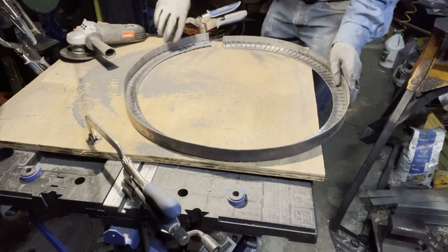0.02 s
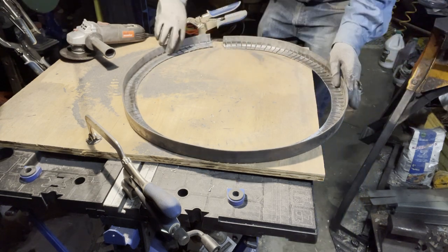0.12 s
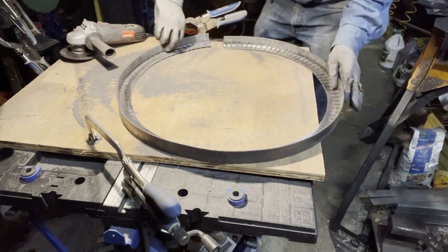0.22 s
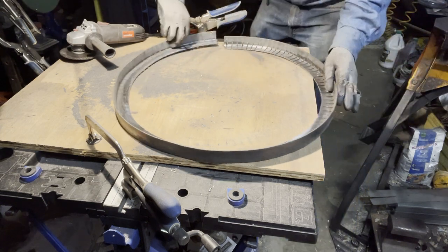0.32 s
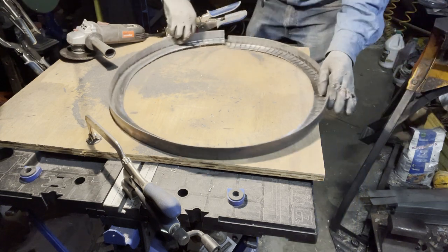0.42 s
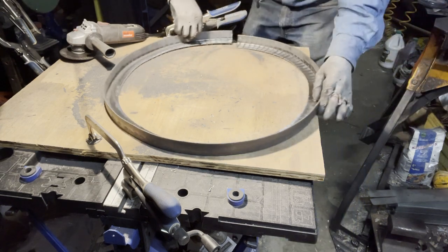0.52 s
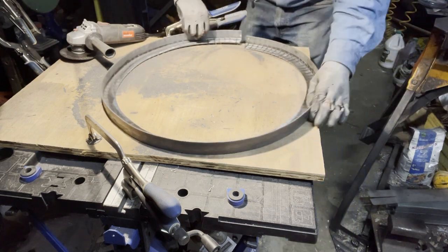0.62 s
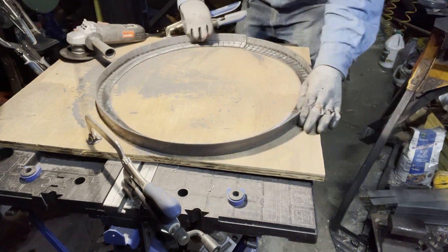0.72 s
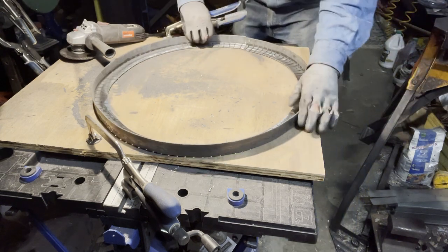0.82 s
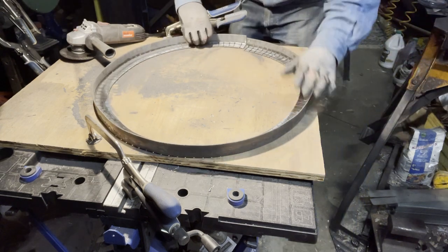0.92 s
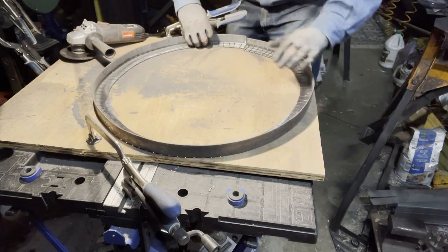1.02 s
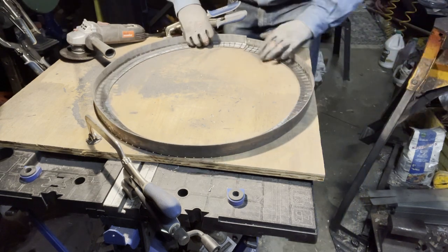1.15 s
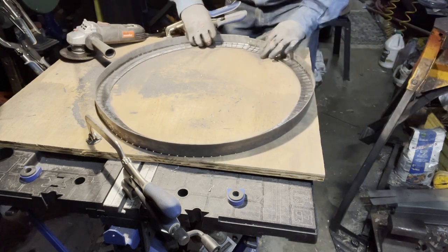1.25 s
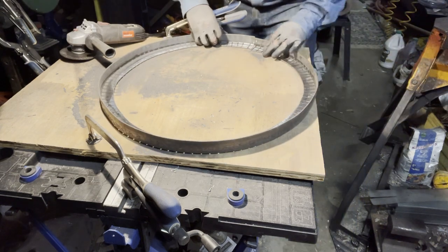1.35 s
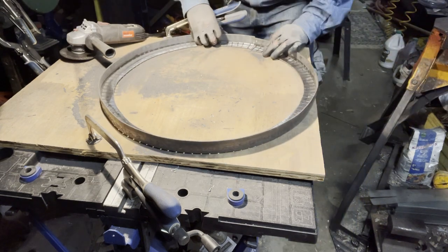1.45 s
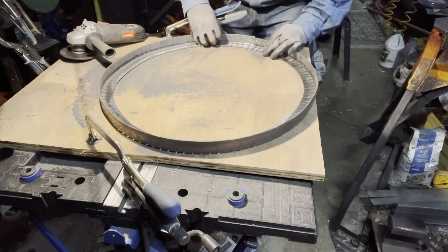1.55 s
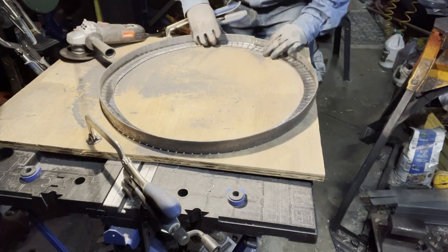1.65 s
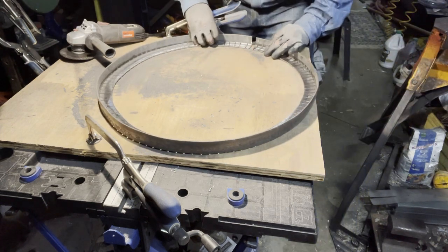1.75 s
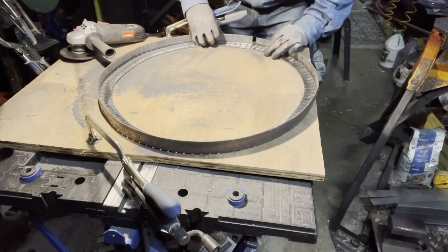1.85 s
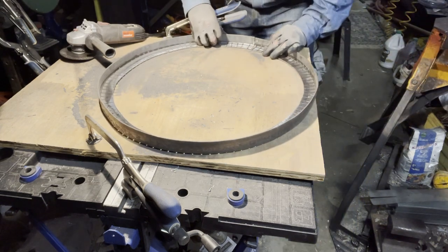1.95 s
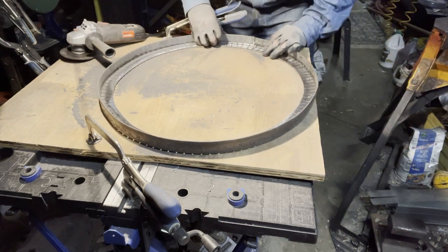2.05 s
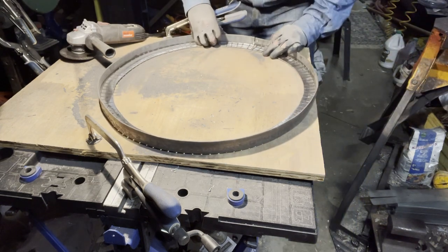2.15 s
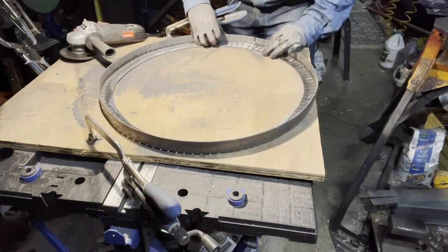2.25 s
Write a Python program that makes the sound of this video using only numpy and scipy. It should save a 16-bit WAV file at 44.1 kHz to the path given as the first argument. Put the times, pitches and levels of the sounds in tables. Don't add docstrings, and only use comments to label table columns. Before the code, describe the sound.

Bent steel band scrapes across a plywood bench top, one long drag then short nudges

```python
import sys
import numpy as np
from scipy import signal
from scipy.fft import rfft, irfft
from scipy.io import wavfile
from scipy.ndimage import uniform_filter1d

SR = 44100
rng = np.random.default_rng(int(sys.argv[2]) if len(sys.argv) > 2 else 0)


def bounce(signal):
    frames = np.transpose(np.atleast_2d(signal))
    limited = np.clip(frames, -1, 1)
    pcm = np.round(limited * 32767).astype(np.int16)
    wavfile.write(sys.argv[1], SR, pcm)


def to_linear_factor(level_db):
    exponent = np.asarray(level_db, float) / 20
    return 10 ** exponent


N = 101430

# (time [s], peak [dB], band ring re peak [dB], fade t60 [s])
SLIPS = [(0.841, -15.5, -26, 0.12), (0.9139, -24.5, -23, 0.17), (0.9743, -39, -9, 0.17),
         (1.0625, -40, -29, 0.17), (1.0949, -40.5, -19, 0.074), (1.141, -39.5, -15, 0.07),
         (1.1668, -48, -3, 0.11), (1.2064, -33.5, 3, 0.17), (1.5757, -51.5, -3, 0.095),
         (1.6192, -51.5, 14.5, 0.079), (1.7348, -30.5, -4, 0.21), (1.919, -45.5, 15, 0.1),
         (2.228, -51, 7, 0.25)]
# (time [s], peak [dB], band ring re peak [dB])
KNOCKS = [
    (0.54, -14, -3),
    (0.693, -21, -6),
    (0.833, -31, -1),
    (0.931, -28.5, 5.5),
    (1.125, -53, -5),
    (1.622, -35, -10),
    (1.758, -36, -21),
    (1.991, -9, -11.5),
]


def level(x, rms_db):
    return x * to_linear_factor(rms_db) / np.sqrt(np.mean(x ** 2))


def on_log(table, hz):
    table = np.array(table, float)
    return np.interp(np.log(hz + 1), np.log(table[:, 0] + 1), table[:, 1])


def colour(x, table):
    return irfft(rfft(x) * to_linear_factor(on_log(table, np.fft.rfftfreq(N, 1 / SR))), N)


def walk(rate_hz):
    hold = int(SR / rate_hz)
    steps = np.repeat(rng.standard_normal(N // hold + 1), hold)
    return 1.57 * uniform_filter1d(steps, hold)[:N]


def clicks(rate_per_s, spread_db, patchy_db):
    when, size, sign = rng.random((3, N))
    height = to_linear_factor(-spread_db * np.log(size + 1e-9))
    x = (when < rate_per_s / SR) * height * np.sign(sign - 0.5)
    return level(x * to_linear_factor(patchy_db * walk(45.24)), 0)


def ring(x, modes, wander_db):
    out = 0
    for k, (hz, db, t60_s) in enumerate(modes):
        pole = np.exp(2j * np.pi * hz / SR - np.log(1000) / (t60_s * SR))
        drive = x * to_linear_factor(wander_db * walk(18))
        gain = (-1) ** k * to_linear_factor(db) / np.sqrt(t60_s)
        out = out + gain * signal.lfilter([1], [1, -pole], drive).imag
    power = sum(to_linear_factor(2 * db) for _, db, _ in modes)
    return out / np.sqrt(SR / np.log(1000) / 4 * power)


def fade(at_s, t60_s):
    t = np.arange(N) / SR - at_s
    return (t >= 0) * to_linear_factor(-60 * np.maximum(t, 0) / t60_s)


def strokes():
    # (time [s], board pressure [dB], sliding speed re pressure [dB], grit re pressure [dB])
    drag = [
        [(0.05, -81, -15, -1), (0.08, -60, 5.5, -6), (0.12, -54.5, 6.5, -11.5), (0.2, -39.5, -5.5, -16.5),
         (0.266, -32.5, -5, -15.5), (0.356, -31.5, -9.5, -20), (0.372, -37.5, 1.5, -11.5),
         (0.484, -26.5, -1.5, -14.5), (0.552, -21, -18.5, -14), (0.6, -32.5, -0.5, -6.5)],
        [(0.6, -23, -10, -18), (0.692, -23.5, -5.5, -17.5), (0.75, -34, 1.5, -14.5),
         (0.814, -32.5, -2.5, -11.5), (0.834, -23, -15, -23.5), (0.848, -32.5, -5, -10.5),
         (1.02, -51, 0.5, -13.5), (1.1, -79, 21.5, 11)],
    ]
    nudges = [
        [(1.1, -80, 25, 15), (1.128, -47.5, -6, -18.5), (1.182, -62, -6, 4.5), (1.214, -41, -25, -26.5),
         (1.26, -49, -15, -9.5), (1.3, -38.5, -10, -17.5)],
        [(1.3, -45, -7, -17), (1.32, -28.5, -4.5, -17.5), (1.338, -25, -15.5, -17.5), (1.36, -20.5, -7.5, -21),
         (1.43, -24.5, -6, -17.5), (1.56, -105.5, 27, 9)],
        [(1.56, -67, -15.5, -5), (1.592, -63.5, -10, -3), (1.63, -39, -6, -30), (1.656, -54, -2, -20),
         (1.708, -68, -2, -9), (1.72, -53, -11, -16)],
        [(1.72, -49.5, -2, -33), (1.736, -37, -6.5, -39), (1.752, -36.5, 1.5, -19.5),
         (1.838, -30.5, -10, -17.5), (1.896, -51.5, 2.5, -11.5), (1.9, -59, -7, -22)],
        [(1.9, -59, 3, -9), (1.93, -37, 0, -12.5), (1.985, -27, -5, -19.5), (2.005, -26.5, -2, -30),
         (2.035, -41, -1, -32), (2.09, -74.5, 19, -39), (2.13, -76, 0.5, -15), (2.21, -79, -3.5, -13),
         (2.235, -52, -4.5, -16), (2.3, -56.5, -2, -19)],
    ]
    time_s, press, slide, grit = np.vstack(drag + nudges).T
    t = np.arange(N) / SR
    return [np.interp(t, time_s, db) for db in (press, press + slide, press + grit)]


def board(press_db, noise):
    # (frequency [Hz], level [dB], t60 [s])
    board_modes = [(96.1, -5.5, 0.23), (118.6, -5, .12), (146, -3.5, 0.14), (175.6, -2, 0.078),
                   (230.7, -5.5, 0.12), (265.4, -3.5, 0.064), (343.2, -1.5, 0.098), (409.8, -5, 0.096),
                   (491, -7.5, 0.093), (586, -8.5, 0.043), (766.7, -4, 0.061), (816, -2.5, 0.051),
                   (858, -3.5, 0.024), (1023, -6.5, 0.011)]
    jolts = to_linear_factor(press_db - 0.5) * clicks(350, 0.97, 0.56)
    knock_noise = level(signal.lfilter([1, -1], [1, -0.86], noise), 0)
    thud = sum(to_linear_factor(db - 6) * fade(s, 0.03) for s, db, _ in KNOCKS) * knock_noise
    low_cut = signal.butter(3, 75, "high", fs=SR, output="sos")
    return signal.sosfilt(low_cut, ring(jolts, board_modes, 1.2) + ring(thud, board_modes, 0))


def band(slide_db, noise):
    # (frequency [Hz], level [dB], t60 [s])
    band_modes = [(1203, -6, 0.036), (1312, -5, 0.046), (1534, -5, 0.025), (1656, -1.5, 0.041),
                  (1923, -8.5, 0.11), (2043, -2, 0.02), (2145, 0, 0.039), (2218, -1, 0.053),
                  (2447, -8, 0.036), (2549, -4, 0.054), (2790, -13, 0.06), (3014, -18, 0.037),
                  (3122, -12.5, 0.056), (3710, -12.5, 0.036)]
    # (frequency [Hz], level [dB], t60 [s])
    after_modes = [(1163, -7, .2), (1351, 0, .24), (2175, -5, .25), (2900, -9, .3), (2805, -8, .3),
                   (3760, -19, .3), (4120, -14, .25)]
    # (frequency [Hz], density [dB per Hz])
    rasp_spectrum = [(500, -12.5), (950, 2.5), (1500, -8), (2200, 3), (3200, -13.5), (3600, -10.5),
                     (6000, -24)]
    hits = sum(to_linear_factor(db + rel - 1.5) * fade(s, 0.024) for s, db, rel in KNOCKS)
    hits = hits + sum(to_linear_factor(db + rel - 3) * fade(s, 0.032) for s, db, rel, _ in SLIPS)
    drive = to_linear_factor(slide_db) * clicks(1300, 1.58, 0.98) + hits * noise
    rasp = colour(drive, rasp_spectrum) * to_linear_factor(2.5)
    steel = ring(drive, band_modes, 2) + to_linear_factor(-11) * ring(drive, after_modes, 1)
    return rasp + to_linear_factor(-3.5) * steel


def grit_and_spit(grit_db, noise):
    # (frequency [Hz], width [Hz], level [dB])
    sheen_modes = [(4450, 170, 7.5), (4574, 26, 14), (5140, 35, 11), (5760, 61, -12), (6084, 65, 8),
                   (6540, 35, -5), (6900, 54, 11.5), (7280, 28, 3), (7100, 20, -19), (7980, 33, 2.5),
                   (8850, 33, 13), (8430, 81, -14), (10200, 21, -18), (9950, 83, 8)]
    # (frequency [Hz], density [dB per Hz])
    grit_spectrum = [(500, -9), (1000, -2.5), (3000, 0), (6000, -7), (10500, -12), (13000, -11),
                     (15600, -15), (16200, -62)]
    hiss = to_linear_factor(grit_db + 1.16 * walk(60.4))
    spit = sum(to_linear_factor(db - 15) * (fade(s, t60_s) + 0.46 * fade(s, 0.0087)) for s, db, _, t60_s in SLIPS)
    grains = clicks(7000, 1.3, 0.6)
    modes = [(hz, db, 2.2 / width_hz) for hz, width_hz, db in sheen_modes]
    sheen = ring((hiss + spit) * grains, modes, 4)
    hiss_noise = level(colour(grains, grit_spectrum), 5.8)
    spit_noise = level(signal.lfilter([1, -1], [1, -0.6], colour(noise, grit_spectrum)), 4.8)
    return to_linear_factor(-10) * sheen + hiss * hiss_noise + spit * spit_noise


def scrape():
    press_db, slide_db, grit_db = strokes()
    noise = rng.standard_normal(N)
    return board(press_db, noise) + band(slide_db, noise) + grit_and_spit(grit_db, noise)


def catches():
    # (time [s], peak [dB], pitch [Hz])
    catch_events = [(.268, -27, 365), (0.287, -27, 124), (0.404, -31, 2100), (0.541, -19, 298),
                    (.550, -21.5, 910), (0.557, -26, 217), (0.579, -33, 246), (.612, -20, 790),
                    (0.626, -23, 420), (.634, -21.5, 400), (.635, -17, 900), (.693, -17.5, 231),
                    (.704, -21.5, 292), (.835, -21, 340), (1.2077, -30, 2320), (1.2085, -34.5, 775),
                    (1.213, -34.5, 935), (1.331, -30, 766), (1.36, -19.5, 2280), (1.385, -20, 193),
                    (1.398, -19.5, 310), (1.411, -19.5, 306), (1.427, -19.5, 187), (1.446, -27, 228),
                    (1.809, -25.5, 298), (1.991, -18.5, 1640), (1.9936, -23, 349), (1.9975, -16, 790),
                    (1.9996, -21, 402), (2.004, -22.5, 2100)]
    swell_cycles = 0.82
    out = np.zeros(N)
    for s, db, hz in catch_events:
        cycles = np.maximum(np.arange(N) / SR - s, 0) * hz
        swell = np.e * cycles / swell_cycles * np.exp(-cycles / swell_cycles)
        out += to_linear_factor(db) * swell * np.sin(2 * np.pi * cycles)
    return out


def sings():
    # (time [s], pitch [Hz], level [dB], length [s])
    sung_modes = [(.656, 800, -19.5, .018), (.52, 3150, -36, .025), (.582, 3200, -35, .045),
                  (.875, 5085, -45, .05), (.442, 1035, -32, .03), (.605, 800, -27, .035),
                  (.697, 790, -27, .03), (.235, 850, -39, .04), (2.023, 2170, -34, .025),
                  (.634, 2250, -33, .015), (.775, 800, -33, .045), (.726, 2150, -31, .012),
                  (1.345, 810, -28, .035), (1.39, 800, -28, .03), (.485, 1030, -33, .02)]
    t = np.arange(N) / SR
    out = np.zeros(N)
    for s, hz, db, length_s in sung_modes:
        swell = np.exp(-((t - s) / length_s * 2) ** 2)
        out += to_linear_factor(db + walk(90)) * swell * np.sin(2 * np.pi * hz * t)
    return out


def hum():
    t = np.arange(N) / SR
    return np.sqrt(2) * to_linear_factor(-54 + 2 * walk(20.75)) * np.sin(2 * np.pi * 119.9 * t)


def shop():
    # (frequency [Hz], density [dB per Hz])
    rumble_spectrum = [(20, -40), (57, 0.5), (100, -12.5), (140, -13.5), (300, -29), (700, -66),
                       (3000, -45), (9000, -57)]
    rumble = colour(rng.standard_normal(N), rumble_spectrum)
    return level(rumble * to_linear_factor(1.5 * walk(5)), -54)


def ports(same, other):
    # (frequency [Hz], phase by which left leads [rad])
    lead_curve = [(0, 0), (200, 0), (430, -.9), (600, 0), (1200, .9), (1700, 0), (3300, -1.4), (4200, -4.8),
                  (5300, -3.1), (8700, 0), (15200, 6.28)]
    # (frequency [Hz], likeness of the ports [0-1])
    alike_curve = [(60, 1), (250, 0.88), (430, .8), (640, 0), (820, 0.75), (1300, 0.36), (6000, 0.34),
                   (8000, 1), (14000, 1)]
    # (frequency [Hz], left minus right [dB])
    tilt_curve = [(60, 3), (300, 5), (700, 0), (3000, 0.7), (8000, -0.4)]
    hz = np.fft.rfftfreq(N, 1 / SR)
    alike = np.clip(on_log(alike_curve, hz), 0, 1)
    side = np.array([[1], [-1]])
    pair = np.sqrt((1 + alike) / 2) * rfft(same) + side * np.sqrt((1 - alike) / 2) * rfft(other)
    lead_rad = np.interp(hz, *np.array(lead_curve).T)
    return irfft(pair * to_linear_factor(side * on_log(tilt_curve, hz) / 2) * np.exp(0.5j * side * lead_rad), N)


def room(near):
    room_t60_s, room_db = 0.26, -19
    tail = rng.standard_normal(SR // 2) * fade(0.0054, room_t60_s)[:SR // 2]
    tail *= to_linear_factor(room_db) / np.sqrt(np.sum(tail ** 2))
    return near + signal.fftconvolve(near, tail[None], axes=1)[:, :N]


def scene():
    same = scrape() + shop() + hum() + catches()
    other = scrape() + shop()
    return room(ports(same, other) + sings())


def roll_off(x):
    return signal.sosfilt(signal.butter(12, 16990, fs=SR, output="sos"), x)


def record(dry):
    low_pass = signal.butter(14, 15950, fs=SR, output="sos")
    mix = signal.sosfiltfilt(low_pass, dry)
    return roll_off(mix)


dry = scene()
out = record(dry)
bounce(out)
```